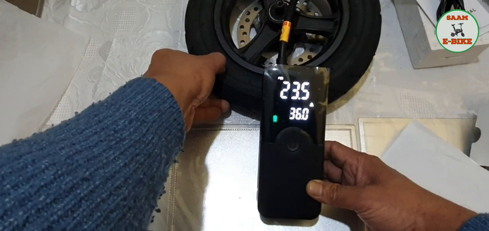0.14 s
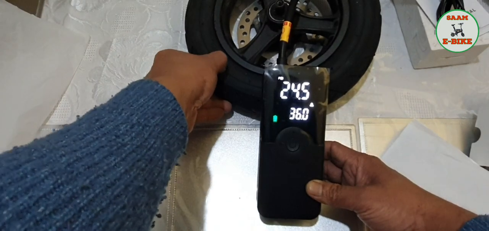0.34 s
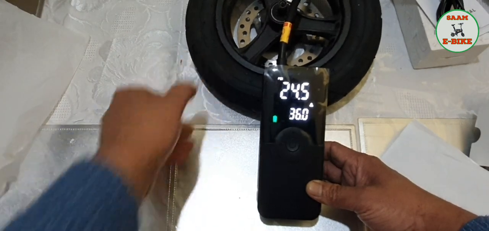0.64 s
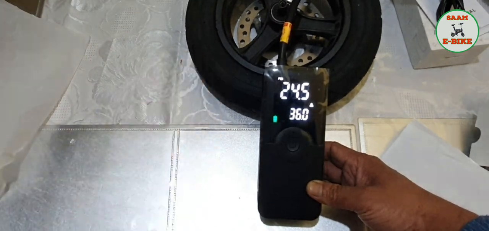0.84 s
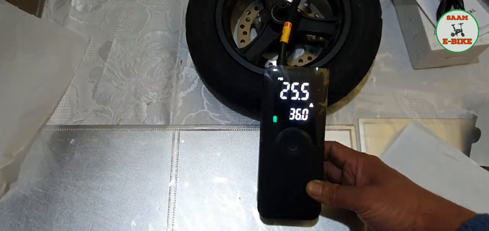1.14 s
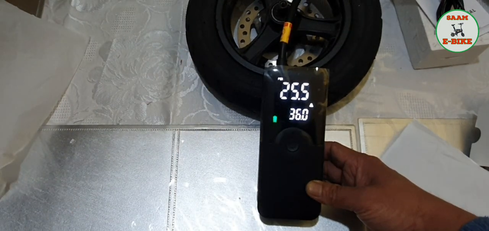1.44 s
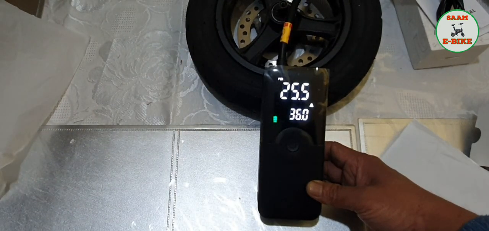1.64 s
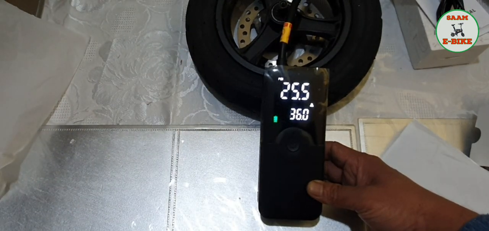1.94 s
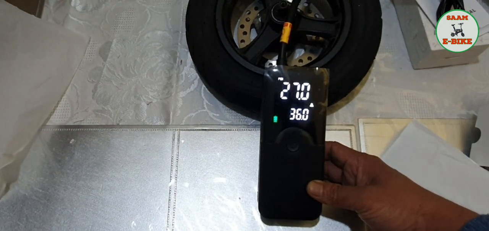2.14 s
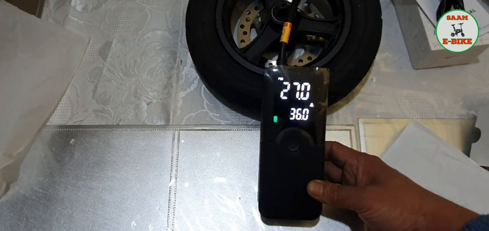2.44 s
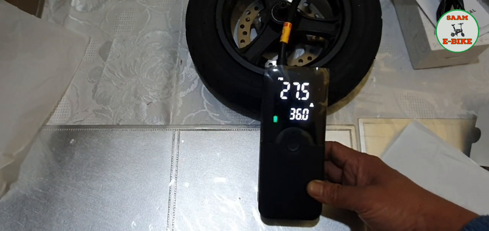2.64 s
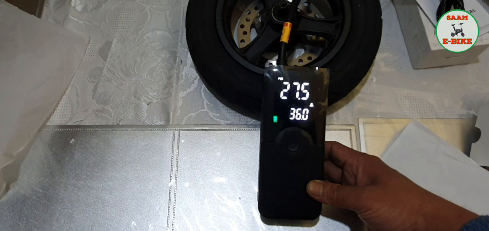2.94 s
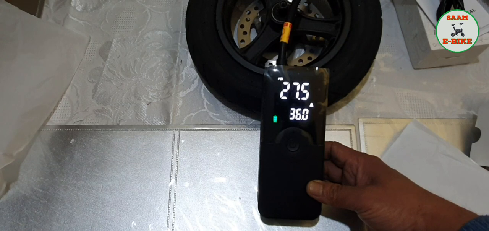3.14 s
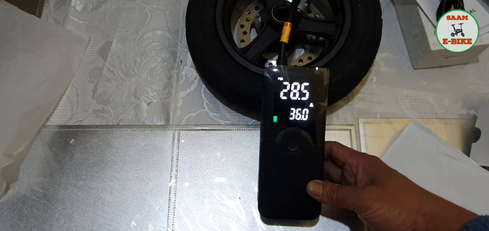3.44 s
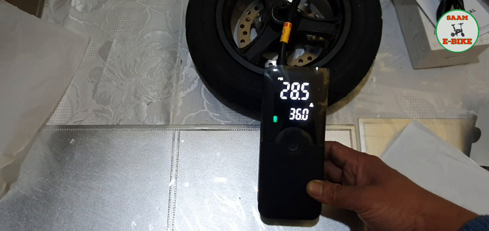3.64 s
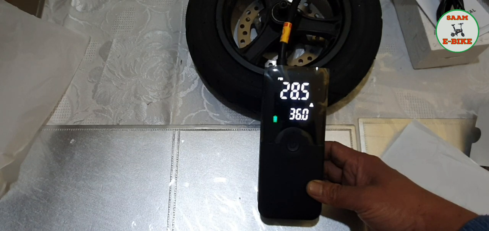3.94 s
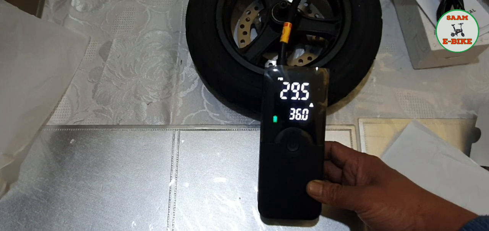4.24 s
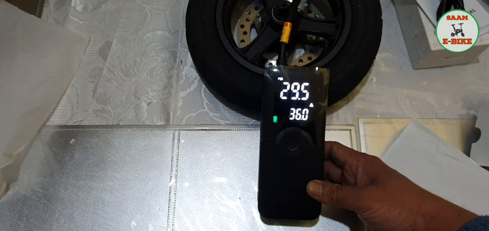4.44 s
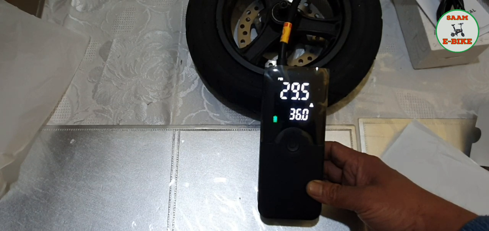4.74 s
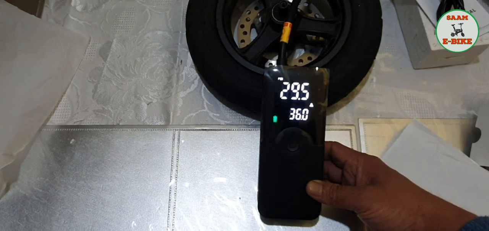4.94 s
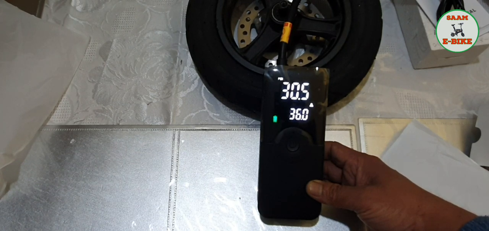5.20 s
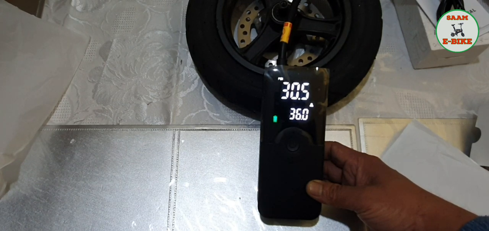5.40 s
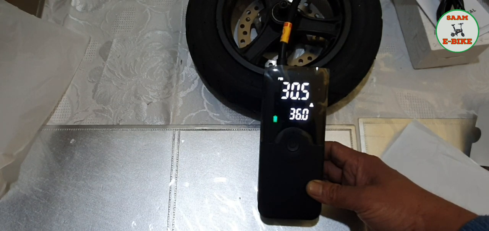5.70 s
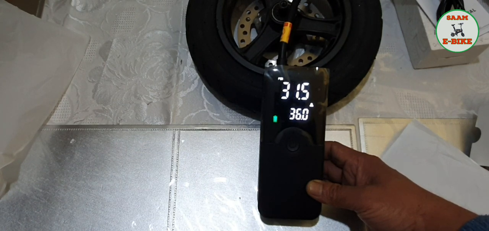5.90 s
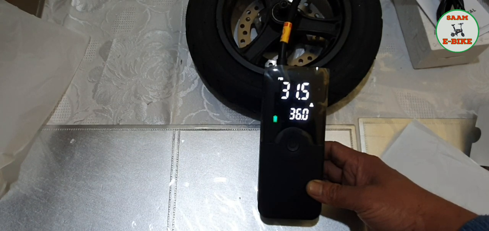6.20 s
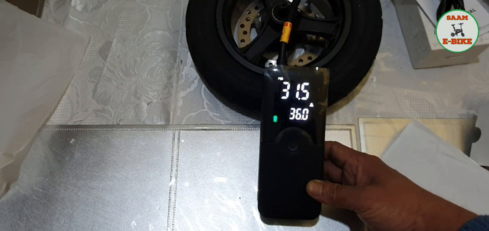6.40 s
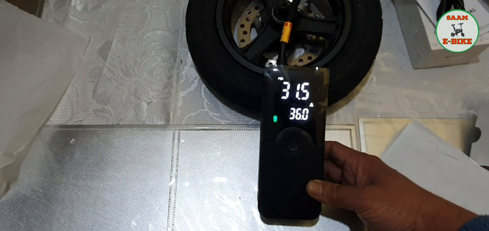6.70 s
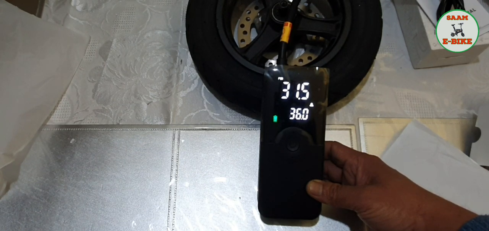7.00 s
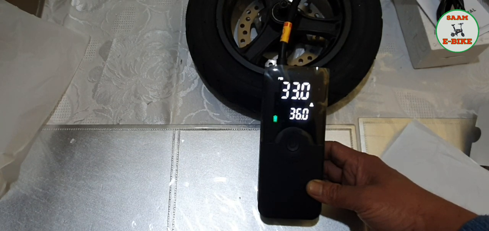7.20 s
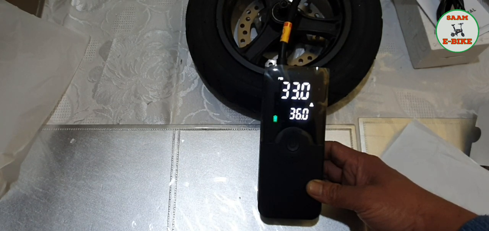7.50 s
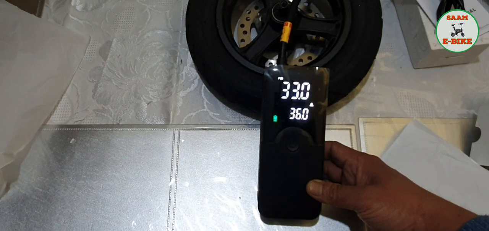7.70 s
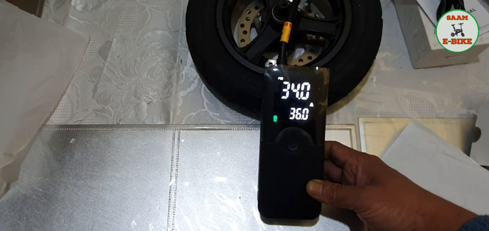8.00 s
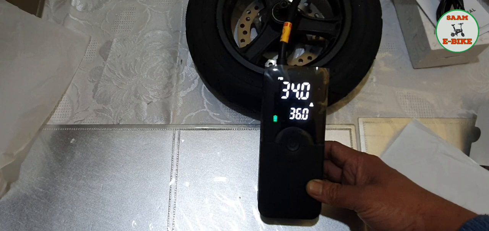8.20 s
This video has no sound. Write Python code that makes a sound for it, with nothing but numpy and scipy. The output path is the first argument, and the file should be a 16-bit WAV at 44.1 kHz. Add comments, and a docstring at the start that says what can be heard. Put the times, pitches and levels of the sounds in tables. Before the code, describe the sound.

Continuous raspy drone of a handheld tire inflator, rapid piston chatter and hissing air, close up in a small tiled room.

```python
"""A reed valve in a cordless tire inflator flutters on each piston stroke in a falling, buzzy chirp.
The chirp rings the plastic case; late in the stroke the reed slaps its seat and adds overtones.
Shaped noise makes the hiss of air and the clacks of the valves; sines make the case shake and the motor hum.
The inflator, held over a tiled floor, slows slightly under the load as it pumps up a scooter tire."""
import sys
import numpy as np
from scipy import signal
from scipy.fft import rfft, irfft, next_fast_len
from scipy.io import wavfile
from scipy.ndimage import map_coordinates

SR = 44100
rng = np.random.default_rng(int(sys.argv[2]) if len(sys.argv) > 2 else 0)


def generate_wav(signal):
    """Clip the signal to [-1, 1] and save it as 16-bit WAV at the path in sys.argv[1]."""
    frames = np.transpose(np.atleast_2d(signal))
    scaled = np.clip(frames, -1, 1) * 32767
    pcm = np.round(scaled).astype(np.int16)
    wavfile.write(sys.argv[1], SR, pcm)


N = 368232

GEAR_RATIO = 4.2  # motor turns per crank turn
TOP_HZ = 15800
START_PRESSURE, PRESSURE_RISE = 0.081, 1  # load on the pump (0 soft tire, 1 firm): at first, gained over the run


def amp(db):
    """Gain for a level in dB."""
    return 10 ** (np.asarray(db) / 20)


def unit(x):
    """The sound scaled to rms 1."""
    return x / np.sqrt(np.mean(x ** 2) + 1e-20)


def sides(db):
    """Left and right gains for a left-minus-right level in dB."""
    return amp(np.array([[.5], [-.5]]) * db)


def along(points, hz):
    """Values read from (Hz, value) points on a log frequency axis."""
    knot_hz, values = np.transpose(points)
    return np.interp(np.log(hz + 1), np.log(knot_hz), values)


def curves(rows, at=None):
    """Each column after the first, read at every sample's time or at the given places."""
    knots, *columns = np.transpose(rows)
    places = np.arange(N) / SR if at is None else at
    return [np.interp(places, knots, column) for column in columns]


def wobble(rate):
    """A smooth random curve with rate knots a second."""
    knots = rng.standard_normal(int(N * rate / SR) + 4)
    return map_coordinates(knots, [np.arange(N) * rate / SR])


def filtered(x, response):
    """The sound shaped by a complex response of frequency."""
    size = next_fast_len(N + SR // 2)
    spectrum = rfft(x, size) * response(np.fft.rfftfreq(size, 1 / SR))
    return irfft(spectrum, size)[..., :N]


def ring(f, hz, width):
    """Response of one resonance, 1 at its peak."""
    return 1j * f * width / (hz * hz - f * f + 1j * f * width)


def pressure():
    """The tire fills at a steady rate and loads the pump."""
    return START_PRESSURE + PRESSURE_RISE * np.arange(N) / N


def crank(flutter=.0012):
    """Turns of the crank so far: the motor slows under the load, briefly recovers and wavers a little."""
    # start_s, strokes_per_s
    speed_curve = [(0, 54.092), (1, 54.024), (5.25, 52.381), (6.3, 52.809), (7.9, 52.184), (8.35, 52.512)]
    start_turn = .164
    strokes_per_s = curves(speed_curve)[0] * (1 + flutter * wobble(12))
    return start_turn + np.cumsum(strokes_per_s) / SR


def reed(turn, scatter=0.0022, detune=0.0037, size_db=0.45):
    """Cycles and strength of the reed's flutter: it falls in each stroke, later and less far at high pressure."""
    # flutter over one stroke: place_turns, soft_tire_hz, firm_tire_hz, soft_tire_db, firm_tire_db
    flutter_path = [(.32, 2514, 2477, -20, -13), (.43, 2477, 2442, 1.5, -4), (.53, 2375, 2332, 0, -3),
                    (.62, 2245, 2034, -6.5, -4), (.7, 1759, 1900, 0.5, -1), (.8, 1494, 1440, -11.5, -2.5),
                    (.87, 938, 1404, 3, -1), (.95, 926, 1375, -12.5, -14)]
    opens_later = 0.1396  # on a firm tire the valve opens later and its sweep runs faster by this share
    stroke = turn.astype(int)
    # every stroke differs a little in timing, pitch and level
    late, sharp, size = rng.standard_normal((stroke[-1] + 1, 3))[stroke].T
    place = 1 - (1 - turn % 1) * (1 + opens_later * pressure()) + scatter * late
    low_hz, high_hz, low_db, high_db = curves(flutter_path, place)
    db = low_db + (high_db - low_db) * pressure()
    hz = (low_hz + (high_hz - low_hz) * pressure()) * (1 + detune * sharp)
    cycles = np.cumsum(hz) / SR
    # the phase is zero at the same point of every stroke, mid-turn
    cycles -= np.interp(stroke + .5 - scatter * late, turn, cycles)
    return cycles, amp(db + size_db * size)


def chirp(cycles, strength):
    """The reed's fundamental sweeps across the case resonances and sets them ringing in turn."""
    # ringing of the plastic case: pitch_hz, width_hz, level_db, left_minus_right_db
    case_modes = [(1020, 52, -1, 2.5), (1445, 128, -2, -2), (1932, 97, 6, -1), (2355, 103, .5, 1.5),
                  (2830, 134, -11, 14)]

    def case_response(f):
        total = 0
        for k, (hz, width, db, pan) in enumerate(case_modes):
            # neighbours ring in opposite polarity
            total = total + (-1) ** k * amp(db) * sides(pan) * ring(f, hz, width)
        return total

    return unit(filtered(strength * np.sin(2 * np.pi * cycles), case_response))


def vented(pair, spectrum):
    """Two sounds coloured, spread between the ears and rung by the vent slots; rms 1."""
    # peaks and notches of the vent slots: pitch_hz, width_hz, lift_db, left_minus_right_db
    vent_slots = [(2135, 145, -3, 6), (2810, 260, 4.5, -1), (3590, 294, 5, -3.5), (4200, 106, -3, 12),
                  (4680, 120, 2, -5.5), (6900, 230, -4.5, -4), (5070, 140, 4, 7.5), (5710, 250, 3.5, 5.5),
                  (8450, 290, 3, 1.5), (9670, 144, 5.5, 5.5), (10320, 190, 3.5, 4), (12320, 160, 5.5, 5.5),
                  (13200, 290, 1, 8), (14300, 270, 2, 6)]
    # how alike the ears are: pitch_hz, likeness (1 same, 0 unrelated)
    ear_likeness = [(100, 0.61), (300, 0.97), (640, 0.35), (1400, 0.49), (3100, 0.35), (6800, -0.026),
                    (15000, -0.042)]
    # stereo lean: pitch_hz, left_minus_right_db
    stereo_lean = [(100, 5), (1500, 3), (5000, 1), (7200, 1.5), (9000, 3.5), (13000, 3), (15500, -0.5)]

    def mid_side(f):
        angle = np.arccos(np.clip(along(ear_likeness, f), -1, 1)) / 2
        return amp(along(spectrum, f)) * [np.cos(angle), np.sin(angle)]

    def slots(f):
        total = 1
        for hz, width, db, pan in vent_slots:
            total = total + (amp(db) * sides(pan) - 1) * ring(f, hz, width)
        return total * sides(along(stereo_lean, f))

    mid, side = filtered(pair, mid_side)
    return unit(filtered(np.array([mid + side, mid - side]), slots))


def buzz(turn, cycles, count=8, width=0.2, octave_db=4):
    """Late in the stroke the reed slaps its seat; the overtones reach each ear by a different path."""
    # colour of the slapping reed: pitch_hz, level_db (per Hz)
    slap_colour = [(1500, -14), (2800, -10.5), (3600, -1), (5100, 1), (7000, -5.5), (9500, -6.5),
                   (12600, -4), (15700, -5)]
    slap_at, slap_later = 0.76, 0.073  # hardest here on a soft tire, this much later on a firm one (turns)
    overtones = [np.sin(2 * np.pi * (k * cycles + rng.random((2, 1)))) for k in range(2, count + 1)]
    octave, *higher = overtones
    octave = octave * amp(octave_db * pressure())  # the lowest overtone grows as the tire firms
    offset = (turn - slap_at - slap_later * pressure() + .5) % 1 - .5
    slap = np.exp(-(offset / width) ** 2)
    return vented(slap * (octave + sum(higher)), slap_colour)


def hiss(turn, ripple=0.057, rough_db=0.5):
    """Air rushes hardest while the piston draws; the motor's turning ripples it."""
    # air flow over one stroke: place_turns, level_db
    puff_shape = [(0, 0), (.2, -1.5), (.42, 0.5), (.55, .5), (.68, 1), (.8, 2), (.92, 2)]
    # colour of the rushing air: pitch_hz, level_db (per Hz)
    air_colour = [(30, -23), (200, -21.5), (450, -16.5), (750, -8), (1050, -2), (1500, -1), (2150, 4),
                  (2750, 0.5), (3300, -1.5), (3800, -4.5), (5200, -6.5), (7000, -6), (9200, -13),
                  (12600, -8), (15700, -15.5)]
    place, db = np.transpose(puff_shape)
    flow = amp(np.interp(turn % 1, place, db, period=1) + rough_db * wobble(900))
    flow *= 1 + ripple * np.sin(2 * np.pi * GEAR_RATIO * turn)
    return vented(flow * rng.standard_normal((2, N)), air_colour)


def clacks(turn, life=0.059, size_db=1.3, repeat=0.66):
    """Each contact is a tiny noise burst, mostly the same from stroke to stroke; life is in turns."""
    # contacts of the valves and rod play: place_turns, level_db
    contacts = [(.04, -6.5), (0.361, -7.5), (.67, -3.5), (.86, -2)]
    # colour of a contact: pitch_hz, level_db (per Hz)
    contact_colour = [(200, -36), (600, -4), (1100, -7), (2200, 10.5), (3500, -3.5), (5000, -13.5),
                      (8000, -14.5), (15000, -3.5)]
    out = np.zeros((2, N))
    for place, db in contacts:
        stroke, age = np.divmod(turn + 1 - place, 1)
        stroke = stroke.astype(int)
        since = np.arange(N) - np.searchsorted(stroke, stroke)  # samples since the contact
        same = rng.standard_normal((2, SR))[:, since]
        fresh = rng.standard_normal((2, N))
        burst = repeat * same + (1 - repeat) * fresh
        stroke_db = db + size_db * rng.standard_normal(stroke[-1] + 1)[stroke]
        out += burst * np.exp(-age / life) * amp(stroke_db)
    return vented(out, contact_colour)


def shake_db():
    """The once-a-turn shake drops when the hand leaves the tire, then eases as the tire firms."""
    soft_db, firm_change_db = -48, -4.5  # level on a soft tire, and its change on a firm one
    hand_db, let_go_s, release_s = 12, .43, .15  # extra while a hand steadies the tire; when, how fast it lets go
    held = np.clip(1 - (np.arange(N) / SR - let_go_s) / release_s, 0, 1)
    return soft_db + firm_change_db * pressure() + hand_db * held


def thrum(turn, level_db=-33, knock=.9, spread=0.95, load_db=2, uneven_db=0.46):
    """The piston shakes the case twice a turn, its overtones bunch into a knock, and the geared motor hums."""
    # piston thrum: stroke_rate_multiple, level_db
    piston_partials = [(2, -2.5), (3, -22.5), (4, -16.5), (5, -16), (6, -13), (7, -17), (8, -12.5),
                       (9, -12), (10, -15), (11, -11.5), (12, -22), (13, -13), (14, -19.5), (15, -16.5),
                       (16, -20), (17, -13.5), (18, -22)]
    # motor hum: motor_speed_multiple, level_db
    motor_partials = [(1, -61), (3, -50.5), (5, -41)]
    # the knock hardens with pressure
    hardness = amp(load_db * (pressure() - .5) + uneven_db * wobble(40))
    partials = []
    for k, db in piston_partials:
        phase = 2 * np.pi * k * (turn - knock) + spread * rng.normal()
        partials.append(amp(db) * np.cos(phase))
    swing, *overtones = partials
    body = swing * amp(.5 * wobble(14)) + hardness * sum(overtones)
    shake = amp(shake_db() + .6 * wobble(8)) * np.sin(2 * np.pi * turn)
    motor = 0
    for k, db in motor_partials:
        motor = motor + amp(db + 2.0 * wobble(5.2)) * np.sin(2 * np.pi * k * GEAR_RATIO * turn)
    # root two makes the levels rms
    return np.sqrt(2) * (amp(level_db) * body + shake + motor) * sides(0.6)


def room(x):
    """A small tiled room answers with decaying noise, different at each ear."""
    # decay of the room: pitch_hz, t60_s
    room_decay = [(200, 0.42), (2000, 0.27), (12000, 0.12)]
    hz, t, z = signal.stft(rng.standard_normal((2, SR // 3)), SR, nperseg=256)
    decay = amp(-60 * t / along(room_decay, hz)[:, None])
    tail = signal.istft(z * decay, SR, nperseg=256)[1]
    delayed = np.pad(x, ((0, 0), (200, 0)))  # samples
    return signal.fftconvolve(delayed, tail / np.linalg.norm(tail[0]), axes=1)[:, :N]


def scene():
    """One crank drives every layer; rising pressure strengthens the chirp and thins the hiss."""
    turn = crank()
    cycles, strength = reed(turn)
    chirp_db = -20.55 + 1.4 * pressure()
    thinning_db = -0.96 * pressure()
    valve = amp(chirp_db) * chirp(cycles, strength)
    valve = valve + amp(-26 + thinning_db) * buzz(turn, cycles)
    air = valve + amp(-20.6 + thinning_db) * hiss(turn)
    air = air + amp(-25 + thinning_db) * clacks(turn)
    wet_db = -9.5
    return air + amp(wet_db) * room(air) + thrum(turn)


def record(dry):
    """A steep low-pass: nothing is kept from TOP_HZ up."""
    return filtered(dry, lambda hz: hz < TOP_HZ)


dry = scene()
out = record(dry)
generate_wav(out)
```